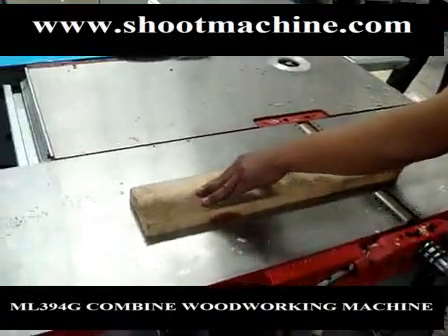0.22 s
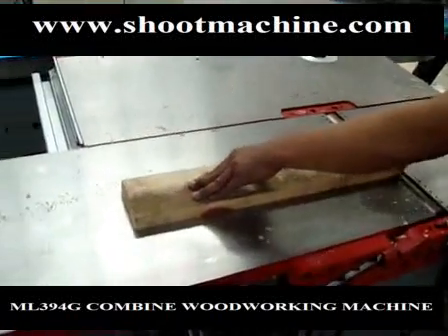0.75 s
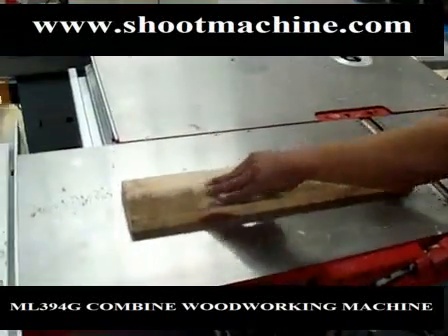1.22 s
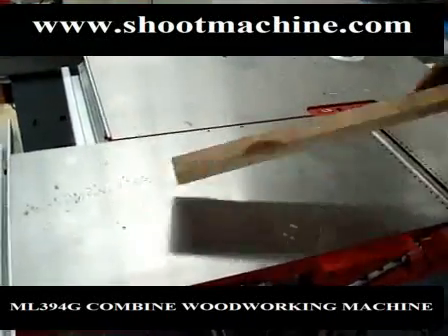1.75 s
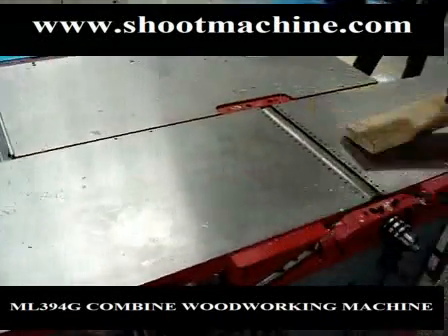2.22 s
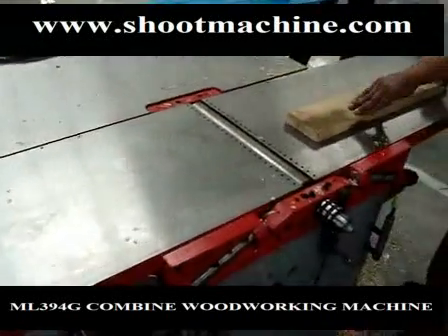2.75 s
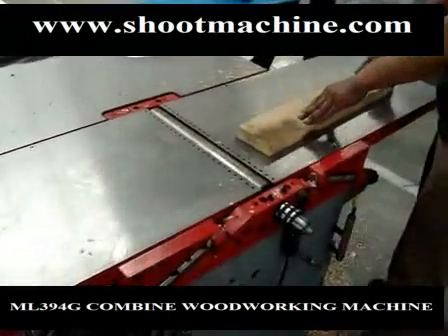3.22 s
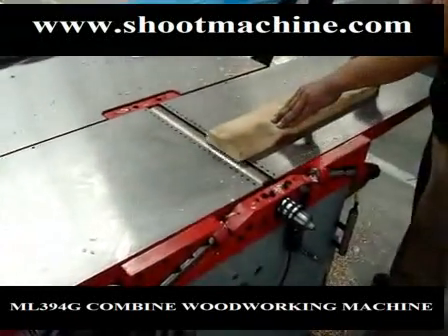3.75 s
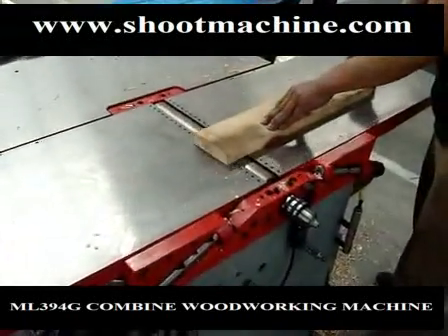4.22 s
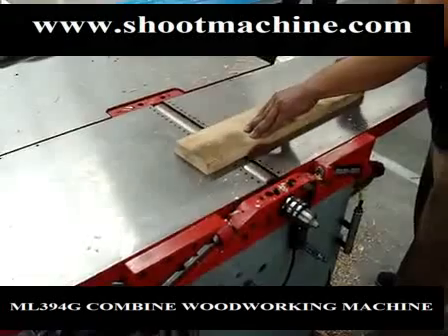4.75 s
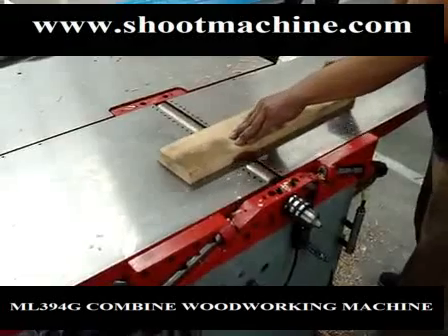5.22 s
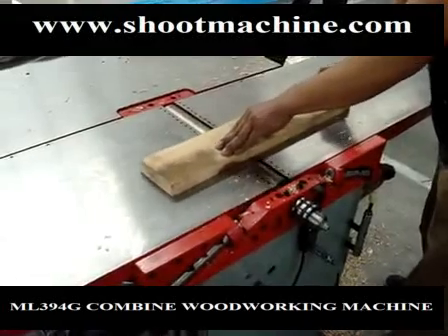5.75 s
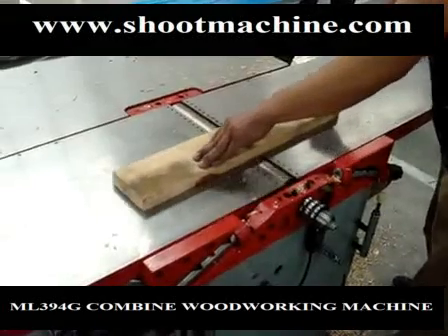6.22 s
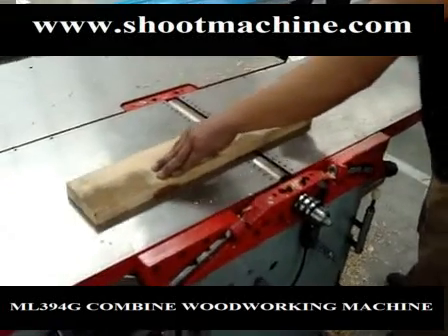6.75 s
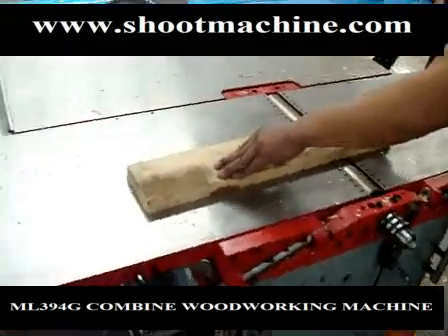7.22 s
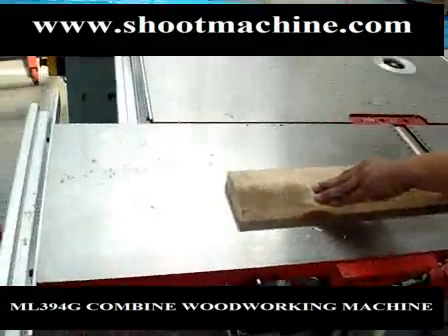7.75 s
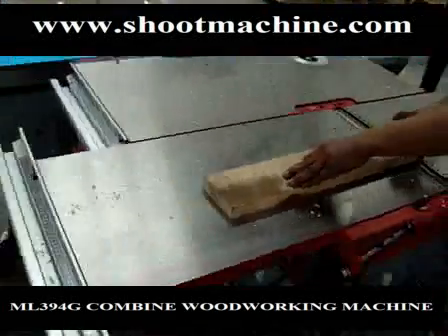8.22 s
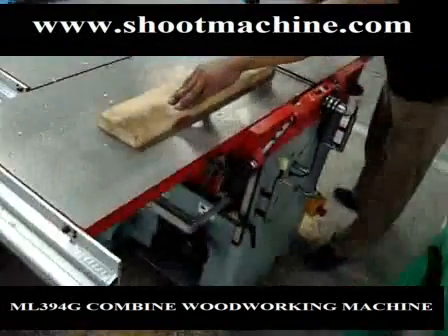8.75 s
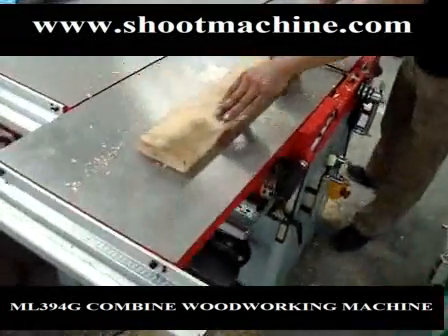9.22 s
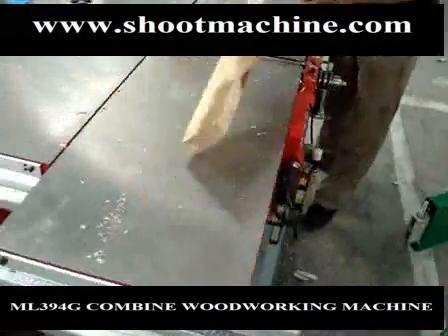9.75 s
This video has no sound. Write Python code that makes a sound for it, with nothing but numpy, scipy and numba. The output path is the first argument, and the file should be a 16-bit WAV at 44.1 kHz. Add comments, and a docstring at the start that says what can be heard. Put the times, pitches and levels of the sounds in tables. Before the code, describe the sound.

A wood planer runs throughout in a workshop, its spinning knives making a steady siren-like whine over a faint motor hum and rushing air. At the start the knives are already rasping through a board, loudest just before the cut ends at about 1 second. A brief hiss of clearing chips follows, and the machine spins freely. At about 3.7 seconds the board meets the knives again with a rough, buzzing rasp. The rapid strikes crackle, tear off hissing chips and make the wood ring at shifting pitches. This cut grows louder from about 5 seconds and stays strong until it stops near 8.8 seconds with another short hiss. The whine then swells until the end at 10 seconds. The microphone is close and moving, so the machine's tones rise and fade in level, with a slight room echo.

```python
"""A wood planer whines in a workshop, its three spinning knives already rasping through a board.
The knives chop the air at the table's edges into a siren, over a motor hum and rushing air.
The board leaves after a second and is pushed across again from about 3.7 to 8.8 seconds.
Each knife strike cracks, makes the board ring at shifting pitches and tears off hissing chips.
A hand-held microphone moves about close by and turns the loudest moments down."""
import sys
import numpy as np
from scipy import signal
from scipy.fft import rfft, irfft
from scipy.io import wavfile
from scipy.ndimage import uniform_filter1d
from numba import njit

SR = 44100
rng = np.random.default_rng(int(sys.argv[2]) if len(sys.argv) > 2 else 0)


def master(y):
    """Save y as 16-bit WAV."""
    cut = np.clip(np.atleast_2d(y).T, -1, 1)
    pcm = np.round(cut * 32767)  # scale
    wavfile.write(sys.argv[1], SR, pcm.astype(np.int16))


N = 441000

# One table for each push of the board. Each row: time in seconds, level of the cut in dB,
# extra level in dB for the cracks and chips.
BOARD_PASSES = [
    [(-.05, -6, -7), (.2, -14.5, 0.5), (.42, -15, 3), (.6, -10.5, -5.5), (.8, 0, -1), (.94, 0.5, -2),
     (.96, -7, 1)],
    [(3.74, -25, -40), (3.77, -18, -40), (3.795, -15.5, -8), (3.83, -23.5, -2), (3.9, -13, -9.5),
     (4.3, -17, -2.5), (4.65, -12, -9.5), (5.2, -7, -3), (5.45, -4.5, -5), (5.9, -2, -5), (6.2, -8, -7),
     (6.5, -5.5, -4), (6.85, -3, -7.5), (7.2, -4, -5.5), (7.6, -3.5, -9), (8, -9, -4.5), (8.3, -5, -5.5),
     (8.55, -6.5, -6.5), (8.6, -4.5, -1), (8.7, -3.5, 1), (8.75, -9.5, 4), (8.77, -13, 2)],
]


def undb(db):
    """Turn decibels into a number to multiply by."""
    return np.exp(np.asarray(db) * np.log(10) / 20)


def unit(x):
    """Scale a sound to an average (rms) level of 1."""
    return x / np.sqrt(np.mean(x ** 2))


def curves(table):
    """Join rows that start with a time by straight lines: one curve for each other column."""
    seconds, *columns = np.transpose(table)
    return np.array([np.interp(np.arange(N) / SR, seconds, column) for column in columns])


def colour(x, points):
    """Shape a sound's bass and treble by (Hz, dB) points, then scale it to level 1."""
    hz, db = np.transpose(points)
    all_hz = np.maximum(np.arange(N // 2 + 1) * SR / N, 1)
    return unit(irfft(rfft(x) * undb(np.interp(np.log(all_hz), np.log(hz), db)), N))


def wander(per_second):
    """A smooth random curve that strays about 1 either side of zero."""
    hold = int(SR / per_second)
    steps = np.repeat(rng.standard_normal(N // hold + 1), hold)
    return 1.3 * uniform_filter1d(uniform_filter1d(steps, hold), hold)[:N]


def touch(board_pass):
    """1 while the board is on the knives, otherwise 0."""
    t = np.arange(N) / SR
    return np.clip(np.minimum(t - board_pass[0][0], board_pass[-1][0] - t) / .0012, 0, 1)


@njit
def band_pass(x, hz, width_hz):
    """Let through only the sound near a pitch that may move (a state-variable filter)."""
    y, band, low = np.empty(len(x)), 0., 0.
    for i in range(len(x)):
        tuning, damping = np.tan(np.pi * hz[i] / SR), width_hz / hz[i]
        swing = (band + tuning * (x[i] - low)) / (1 + tuning * (tuning + damping))
        band, low = 2 * swing - band, low + 2 * tuning * swing
        y[i] = damping * swing
    return y


def ring(x, hz, width_hz):
    """Ring at one pitch: filter twice for steep sides, then scale to level 1."""
    return unit(band_pass(band_pass(x, hz, float(width_hz)), hz, float(width_hz)))


def siren(turns):
    """Three knives chop the air each turn, and the unbalanced shaft hums."""
    # The tones swell and fade as the microphone moves. Each row: time in seconds, then levels
    # in dB of the knife tone, its 2nd, 3rd and 4th harmonics, and the hum.
    siren_levels = [(0, -29, -34, -23, -18, -35), (.8, -25, -41, -35, -47, -37.5),
                    (1.17, -26.5, -33, -26, -26.5, -40.5), (1.5, -26.5, -32, -27.5, -26, -34),
                    (2.14, -26, -25, -22, -25, -31.5), (2.28, -28, -22.5, -38, -24, -31.5),
                    (2.45, -25, -25.5, -21, -23, -31), (2.92, -24.5, -23, -16.5, -24.5, -33),
                    (3.3, -25, -23, -19.5, -24.5, -33.5), (3.68, -22.5, -20.5, -30, -25.5, -31.5),
                    (3.78, -19, -27, -22, -21, -28.5), (3.82, -29, -30, -34, -22, -41),
                    (3.95, -32, -33, -22, -21.5, -40), (4.5, -32.5, -25, -46, -21.5, -37),
                    (6, -24.5, -25.5, -28, -15, -40), (8, -29.5, -46, -29, -21.5, -37.5),
                    (8.4, -31.5, -27.5, -23, -45, -43), (8.75, -27.5, -29, -30, -35, -65),
                    (8.9, -26, -17, -19.5, -54, -40.5), (9.2, -25, -16.5, -13.5, -28, -41),
                    (9.5, -22, -13.5, -13, -53, -37), (9.62, -22.5, -15.5, -13, -26, -41),
                    (9.8, -21.5, -11.5, -18, -23, -37), (10, -17, -11, -12.5, -23, -42)]
    # Each row: time in seconds, levels in dB of the knife tone's 6th and 7th harmonics.
    whine_levels = [(0, -23.5, -49), (1.5, -27, -29.5), (2.3, -28.5, -35), (3.7, -29, -35),
                    (8.9, -30, -28.5), (9.5, -36, -26.5), (10, -28, -29.5)]
    *knife_db, hum_db = curves(siren_levels)
    tones = [*zip((3, 6, 9, 12), knife_db), (2, hum_db), (4, hum_db + 4.5)]
    tones += zip((18, 21), curves(whine_levels))
    return np.sqrt(2) * sum(undb(db + .96 * wander(25)) * np.cos(2 * np.pi * per_turn * turns)
                            for per_turn, db in tones)


def motor(turns):
    """The motor and its spinning shaft add faint tones that waver in level."""
    # Shaft tones. Each row: vibrations per turn, relative level in dB.
    shaft_tones = [(5, -2), (8, 1), (10, 6.5), (11, 8), (13, 3), (15, -8), (16, -11.5), (24, 0), (30, -7)]
    # Motor tones. Each row: pitch in Hz, relative level in dB.
    motor_tones = [(160, -14), (403, -3), (511, 1.5)]
    t = np.arange(N) / SR
    shaft = sum(undb(db + 2.8 * wander(14)) * np.cos(2 * np.pi * (per_turn * turns + rng.random()))
                for per_turn, db in shaft_tones)
    hum = sum(undb(db + 4 * wander(8)) * np.cos(2 * np.pi * hz * t) for hz, db in motor_tones)
    return np.sqrt(2) * (shaft + hum)


def rushing_air(turns):
    """Swirling air throbs with the knives and hisses more while loose chips clear after a pass."""
    # The air's tone colour. Each row: frequency in Hz, relative level in dB.
    air_colour = [(65, -53), (110, -30), (167, -17), (365, -4.5), (459, -7.5), (544, -3.5), (610, -2),
                  (812, 0), (1520, -3), (1670, -7.5), (1770, -5), (4090, -10.5), (10400, -33.5),
                  (13500, -76), (22000, -120)]
    clearing_db, clearing_s = 10.5, .28
    t = np.arange(N) / SR
    throb = 1 + .048 * np.cos(2 * np.pi * 3 * turns)
    air = colour(rng.standard_normal(N), air_colour) * throb * undb(18.5 + .1 * wander(7.4))
    dull = signal.sosfilt(signal.butter(1, 2000, fs=SR, output="sos"), air)
    ends = [board_pass[-1][0] for board_pass in BOARD_PASSES]
    clearing = sum((t > end) * np.exp(-np.abs(t - end) / clearing_s) for end in ends)
    return dull + undb(clearing_db * clearing) * (air - dull)


def knife_strikes(turns, knife_db, jitter_s=3e-6, scatter_db=.7):
    """One click as each knife meets the wood, a little uneven in time and size."""
    # The knives are unevenly spaced. Each entry: how late one knife strikes, in milliseconds.
    knife_late_ms = [0.088, 0, -0.034]
    count = 3 * turns
    at = np.flatnonzero(np.diff(np.floor(count)))  # the sample just before each strike
    size_luck, time_luck = rng.standard_normal((N // 100, 2))[:len(at)].T
    strike = np.floor(count[at + 1])
    knife = strike.astype(int) % 3
    size = undb(knife_db[knife, at] + scatter_db * size_luck)
    late_s = np.array([ms + .012 * wander(.704) for ms in knife_late_ms]) / 1000
    place = at + (strike - count[at]) / (count[at + 1] - count[at])
    place = place + 20 + SR * (late_s[knife, at] + jitter_s * time_luck)
    # A click falls between samples, so it is shared among the 16 nearest.
    nearest = np.floor(place)[:, None].astype(int) + np.arange(-7, 9)
    gap = nearest - place[:, None]
    clicks = np.zeros(N + 64)
    np.add.at(clicks, nearest, size[:, None] * np.sinc(gap) * np.cos(np.pi * gap / 16) ** 2)
    return unit(clicks[:N])


def tearing_wood(clicks, puffs):
    """Each strike cracks sharply, and the torn fibres hiss just after it."""
    # Tone colours of the crack and the chips. Each row: frequency in Hz, relative level in dB.
    crack_colour = [(300, -40), (700, -26), (1100, -22), (1700, -15), (3700, -11), (5400, -6), (6200, -3),
                    (8000, -4), (9400, -12), (10400, -26)]
    chip_colour = [(300, -51), (700, -35.5), (1200, -17), (2000, -19), (3700, -15), (5400, -15.5),
                   (6200, -16.5), (8500, -22.5), (10400, -32)]
    crack = undb(-6) * colour(clicks, crack_colour)
    chips = undb(-5 + 1.3 * wander(9)) * colour(puffs * rng.standard_normal(N), chip_colour)
    return crack + chips


def ringing_board(clicks, thumps, puffs):
    """The struck board rings at pitches that shift as the grip and overhang change."""
    # Lasting rings. Each row: pitch in Hz, filter width in Hz, relative level in dB.
    lasting_rings = [(943, 440, -16), (1420, 720, -5.5), (2000, 614, -5.5), (2987, 1320, -4),
                     (3766, 320, -9), (4450, 860, -8), (5110, 400, -15)]
    # Brief rings. Each row: time of the peak in seconds, seconds to swell (and again to fade),
    # pitch in Hz, filter width in Hz, relative level in dB.
    brief_rings = [(0.05, 0.13, 1760, 550, -4.5), (0.09, 0.4, 2900, 600, -5), (0.13, 0.087, 4652, 108, -16),
                   (0.17, 0.36, 3410, 540, -2), (0.27, 0.2, 5150, 288, -15), (0.27, 0.44, 4290, 180, -3.5),
                   (0.28, 0.27, 1070, 107, 1), (0.43, 0.22, 5220, 292, -2.5), (0.46, 0.12, 1054, 108, -2),
                   (0.47, 0.18, 3550, 300, -2), (0.53, 0.66, 1677, 110, -5), (0.57, 0.45, 1906, 109, -10),
                   (0.69, 0.42, 1078, 110, -0.5), (0.78, 0.15, 3750, 293, -12), (0.79, 0.22, 2540, 182, -7),
                   (0.82, 0.22, 3030, 282, -6.5), (3.8, 0.025, 990, 620, -17), (3.8, 0.06, 3600, 110, -9),
                   (3.82, 0.12, 4300, 109.8, -5), (3.85, 0.08, 4100, 182, -20), (3.87, 0.11, 3250, 600, 2),
                   (3.91, 0.057, 1030, 680, 5.5), (4.02, 0.15, 3270, 114.6, -7), (4.13, 0.39, 4080, 178, 2),
                   (4.16, 0.46, 850, 107, -4), (4.2, 0.19, 3270, 109, -2), (4.22, 0.22, 4400, 110, -17),
                   (4.23, 0.15, 1650, 111, -1), (4.41, 0.36, 4160, 111, -8), (4.41, 0.91, 1597, 111, -2),
                   (4.54, 0.38, 1073, 110, -2.5), (4.61, 0.37, 4270, 113.6, -28),
                   (4.62, 0.19, 1950, 110, -11), (4.66, 0.18, 3570, 250, -6), (4.63, 0.36, 2500, 177, -4),
                   (4.64, 0.031, 1650, 110, 2), (4.65, 0.16, 4300, 180, -23), (4.66, 0.25, 3070, 108, -9),
                   (4.86, 0.15, 1550, 109, -26), (4.88, 0.11, 4380, 180, -22),
                   (4.93, 0.077, 3640, 110, -16), (4.97, 0.092, 3300, 110, -27), (5.08, 0.64, 3500, 285, 3),
                   (5.17, 0.26, 4360, 110, -16), (5.36, 0.29, 4550, 476, -4.5), (5.39, 0.19, 1670, 110, -5),
                   (5.41, 0.098, 5200, 180, -26), (5.85, 0.21, 5430, 180, -13.5),
                   (5.65, 0.31, 1680, 110, -5), (5.66, 0.29, 3070, 450, -14), (5.85, 0.2, 4460, 400, -12),
                   (5.87, 0.17, 1620, 110, -22), (5.98, 0.16, 3500, 298, 0), (6.0, 0.14, 4370, 287, 0),
                   (6.12, 0.18, 3800, 290, -3), (6.13, 0.1, 4400, 181, -19), (6.14, 0.61, 1672, 110, -1.5),
                   (6.28, 0.24, 4020, 110, -2.5), (6.33, 0.07, 5300, 400, -9), (6.4, 0.13, 2810, 290, -25),
                   (6.41, 0.22, 1600, 110, -17), (6.42, 0.14, 2220, 110, -9), (6.52, 0.19, 4550, 290, -6),
                   (6.57, 0.57, 2690, 470, -3), (6.75, 0.23, 5200, 292, -8.5),
                   (6.83, 0.44, 3710, 552, -6.5), (6.88, 0.48, 3350, 180, -8.5),
                   (6.92, 0.12, 4430, 186, -21), (7.12, 0.11, 4750, 447, -12), (7.36, 0.18, 5200, 450, -10),
                   (7.03, 0.11, 3950, 110, -17.5), (7.14, 0.37, 1434, 111, -9),
                   (7.18, 0.55, 4000, 550, -5.5), (7.19, 0.23, 3700, 290, -7), (7.19, 1, 1710, 297, -1.5),
                   (7.57, 0.26, 1306, 290, -12), (7.58, 0.38, 1840, 470, -12), (7.59, 0.072, 3600, 180, -6),
                   (7.7, 0.32, 2980, 180, -21), (7.71, 1, 2300, 593, -1), (7.89, 0.12, 3700, 920, -26),
                   (7.96, 0.43, 2820, 450, -6.5), (8.02, 0.22, 3760, 298, -6),
                   (8.13, 0.062, 5100, 470, -20), (8.14, 0.32, 3620, 179, -5),
                   (8.15, 0.071, 4300, 180, -9.0), (8.2, 0.39, 1376, 110, -7), (8.22, 0.15, 3180, 180, -34),
                   (8.4, 0.82, 1114, 290, -1), (8.43, 0.34, 3000, 113, -5), (8.5, 0.078, 4200, 110, -10.5),
                   (8.55, 0.12, 820, 110, -5), (8.57, 0.16, 3720, 110, -9), (8.59, 0.14, 1393, 300, -6),
                   (8.59, 0.085, 2780, 110, -4.5), (8.63, 0.073, 5000, 400, -12),
                   (8.71, 0.1, 2750, 109, -6)]
    pitch_drift, flicker_db, thump_below_hz = .015, 1.3, 2100
    t = np.arange(N) / SR
    grit = undb(-23) * unit(puffs * rng.standard_normal(N))
    blows = lambda hz: (thumps if hz < thump_below_hz else clicks) + grit
    board = np.zeros(N)
    for hz, width_hz, db in lasting_rings:
        level = undb(db + flicker_db * wander(6))
        board += level * ring(blows(hz), hz * (1 + pitch_drift * wander(2.92)), width_hz)
    waver = wander(10)
    for k, (peak_s, swell_s, hz, width_hz, db) in enumerate(brief_rings):
        a, b = np.clip([int((peak_s - swell_s) * SR), int((peak_s + swell_s) * SR)], 0, N)
        level = undb(db + flicker_db * np.roll(waver, 9973 * k)[a:b])  # each flickers its own way
        swell = np.cos(np.pi * (t[a:b] - peak_s) / (2 * swell_s)) ** 2
        board[a:b] += level * swell * ring(blows(hz)[a:b], np.full(b - a, float(hz)), width_hz)
    return board


def chirp(x, lag_ms_per_khz=.08):
    """Smear each strike into a very short rising chirp, so it sounds less spiky."""
    khz = np.arange(N // 2 + 1) * SR / N / 1000
    return irfft(rfft(x) * np.exp(-1j * np.pi * lag_ms_per_khz * khz ** 2), N)


def cutting(turns):
    """While the board is pushed across, the knife strikes ring it and tear it."""
    # The knives stick out unevenly. Each row: time in seconds, then the strength of the first
    # and of the last knife in dB, compared with the middle one.
    knife_levels = [(0, -13, -9), (.75, 4, -30), (.88, -28, -31), (3.73, -20, -16), (3.8, 7.5, 2),
                    (3.86, 4, -3.5), (4.6, 6.5, -5.5), (5.2, -13.5, -5.5), (5.9, -3, -16), (6.2, 7.5, -32),
                    (7, -8, -13), (7.9, -12, 1.5), (8.3, -7.5, -29.5), (8.77, -12.5, -12)]
    first_db, last_db = curves(knife_levels)
    knife_db = np.array([first_db, np.zeros(N), last_db])
    clicks = knife_strikes(turns, knife_db)
    thumps = knife_strikes(turns, .94 * knife_db)  # low rings feel the three knives more alike
    clicks *= undb(1.5 * wander(14))  # the strikes come in rough bursts
    fade_per_sample = np.exp(-1 / (.008 * SR))
    puffs = .075 + unit(signal.lfilter([1], [1, -fade_per_sample], np.abs(clicks)))
    tearing = tearing_wood(clicks, puffs)
    board = ringing_board(clicks, thumps, puffs)
    cut = np.zeros(N)
    for board_pass in BOARD_PASSES:
        cut_db, tear_db = curves(board_pass)
        cut += touch(board_pass) * undb(cut_db) * (board + undb(tear_db) * tearing)
    return chirp(cut)


def echo_tail(fade_s, gap_s):
    """The dense echoes of one click: silent until gap_s, and 60 dB weaker every fade_s."""
    t = np.arange(SR // 2) / SR
    tail = rng.standard_normal(len(t)) * undb(-60 * t / fade_s) * (t > gap_s)
    return tail / np.sqrt(np.sum(tail ** 2))


def echoes(x, fade_s, gap_s):
    """Two sets of echoes blend slowly into each other as board and microphone move."""
    here, there = (signal.fftconvolve(x, echo_tail(fade_s, gap_s))[:N] for _ in range(2))
    blend = 2.5 * wander(.8)
    return np.cos(blend) * here + np.sin(blend) * there


def workshop(x):
    """The planer's table and guide fence return short echoes; the walls ring on."""
    table = undb(-18) * echoes(x, fade_s=.03, gap_s=.0005)
    walls = undb(-22) * echoes(x, fade_s=.5, gap_s=.008)
    return x + table + walls


def scene():
    """The running planer and two passes of the board, which slow the motor a little."""
    shaft_hz, slowing_hz, slowing_s = 91.37, .16, .15
    touching = sum(touch(board_pass) for board_pass in BOARD_PASSES)
    load = uniform_filter1d(touching, int(slowing_s * SR))
    turns = .45 + np.cumsum(shaft_hz - slowing_hz * load) / SR  # shaft turns so far
    background = undb(-39 - touching)  # 1 dB quieter while the board covers the knives
    machine = siren(turns) + background * (motor(turns) + rushing_air(turns))
    return (machine + workshop(cutting(turns)))[None]


@njit
def follow(target, fall_s, rise_s):
    """A volume setting that drops to its target and climbs back, each at its own speed."""
    fall, rise = 1 / (fall_s * SR), 1 / (rise_s * SR)
    gain, now = np.empty(len(target)), target[:4000].mean()
    for i in range(len(target)):
        now += (target[i] - now) * (fall if target[i] < now else rise)
        gain[i] = now
    return gain


def record(dry):
    """The microphone turns loud sound down, rounds sharp peaks and cuts the bass and top treble."""
    limit_db, lowest_hz, highest_hz = -14, 151, 10350
    level = np.sqrt(uniform_filter1d(dry[0] ** 2, size=300))
    target = np.minimum(1, undb(limit_db) / level)
    even = dry * follow(target, fall_s=.004, rise_s=.82)
    rounded = np.tanh(1.2 * even) / 1.2
    thin = signal.sosfilt(signal.butter(4, lowest_hz, "high", fs=SR, output="sos"), rounded)
    return signal.sosfilt(signal.ellip(10, .2, 80, highest_hz, fs=SR, output="sos"), thin)


dry = scene()
out = record(dry)
master(out)
```